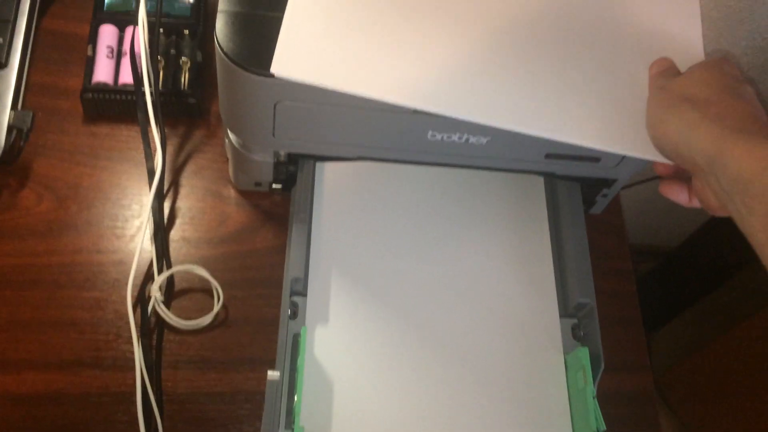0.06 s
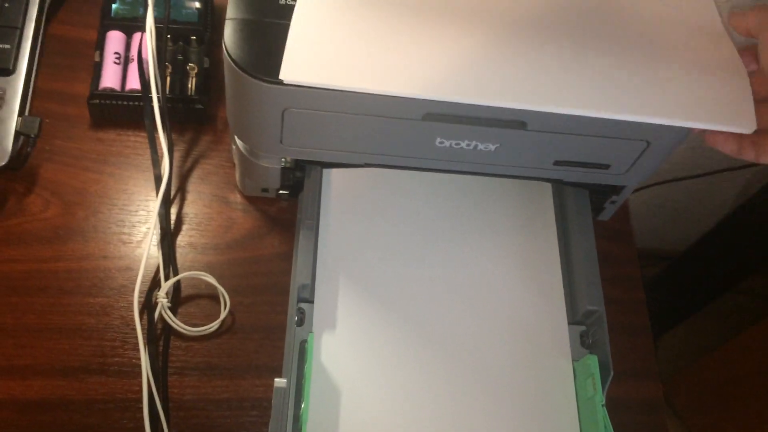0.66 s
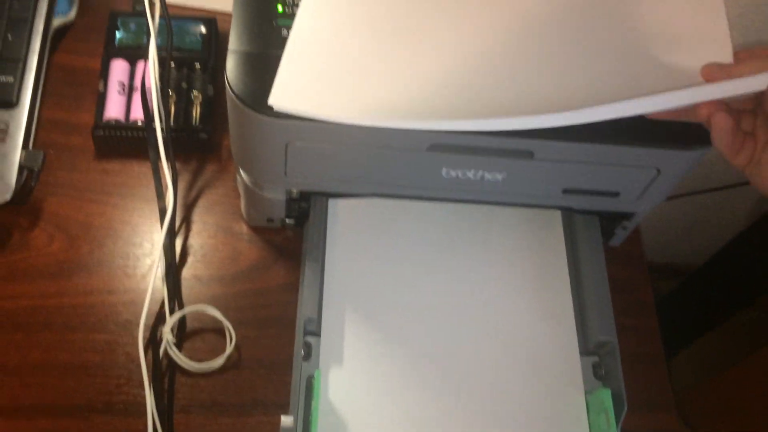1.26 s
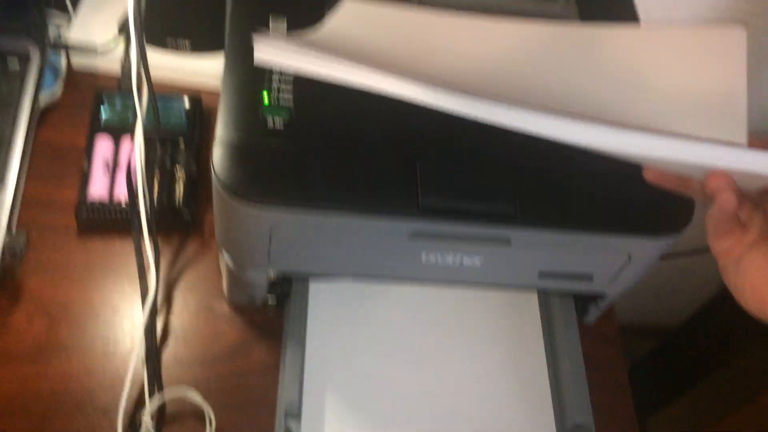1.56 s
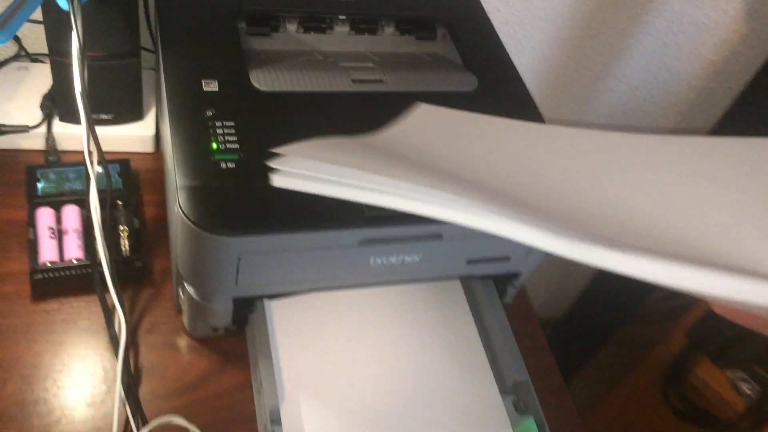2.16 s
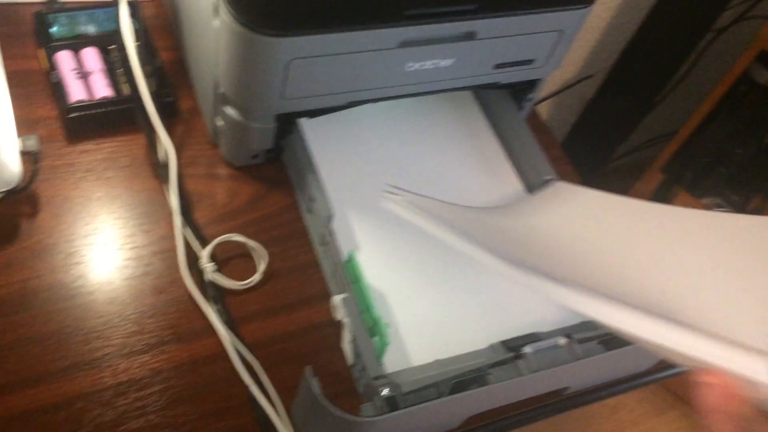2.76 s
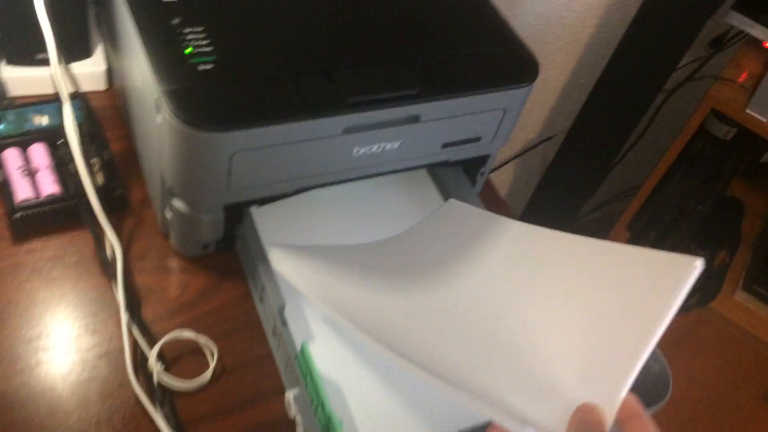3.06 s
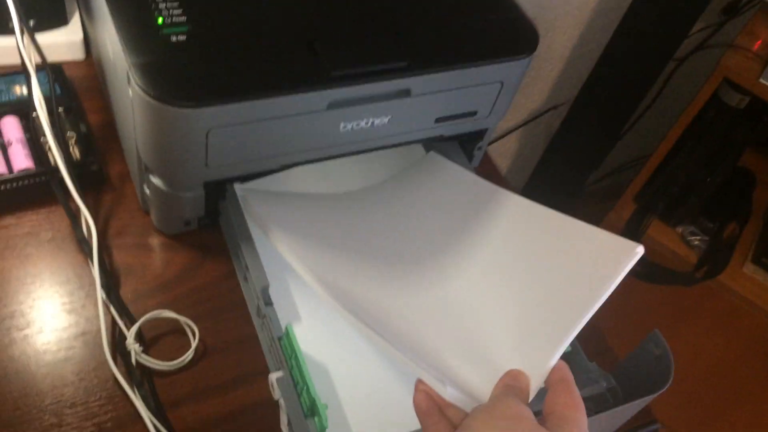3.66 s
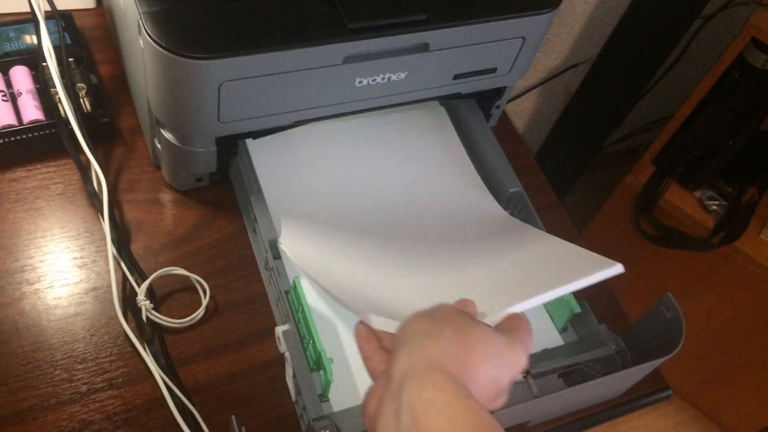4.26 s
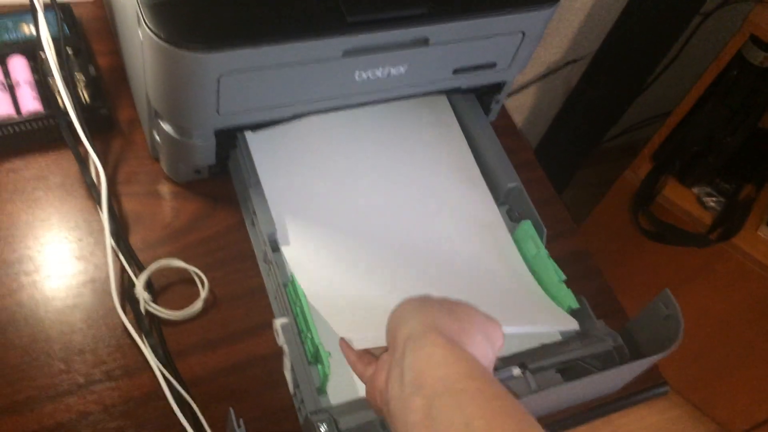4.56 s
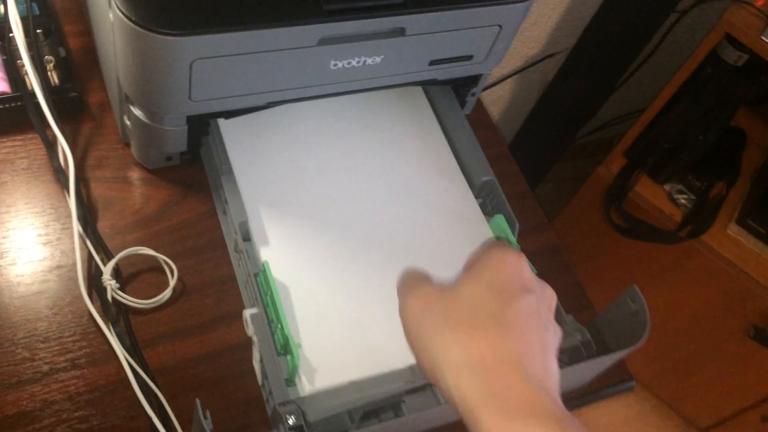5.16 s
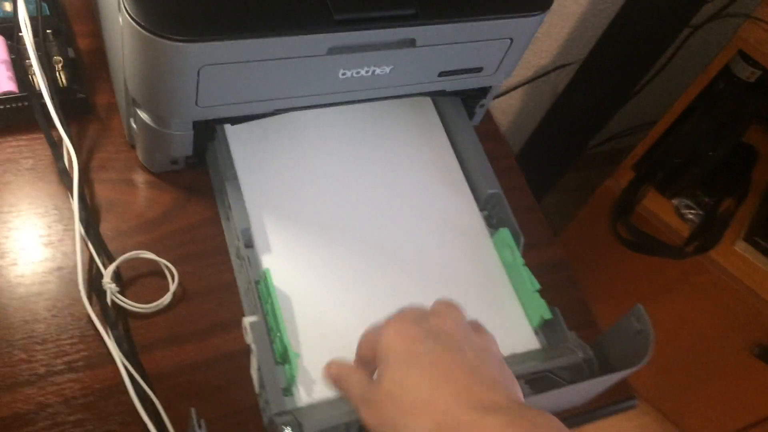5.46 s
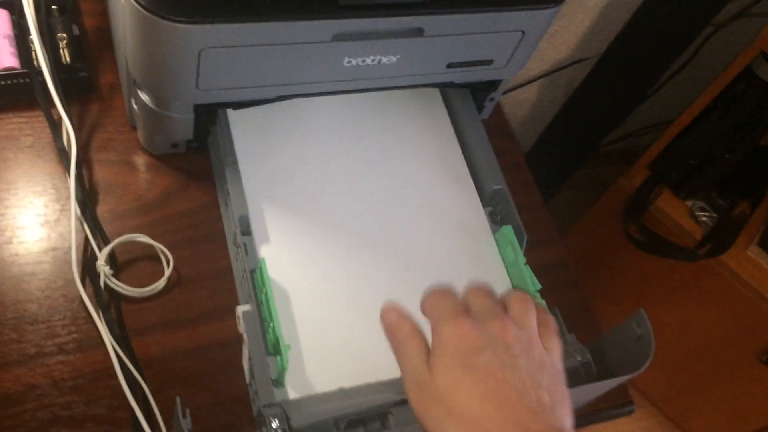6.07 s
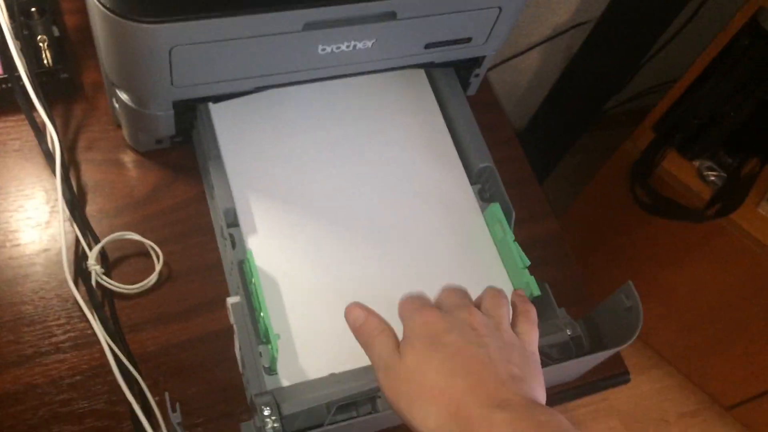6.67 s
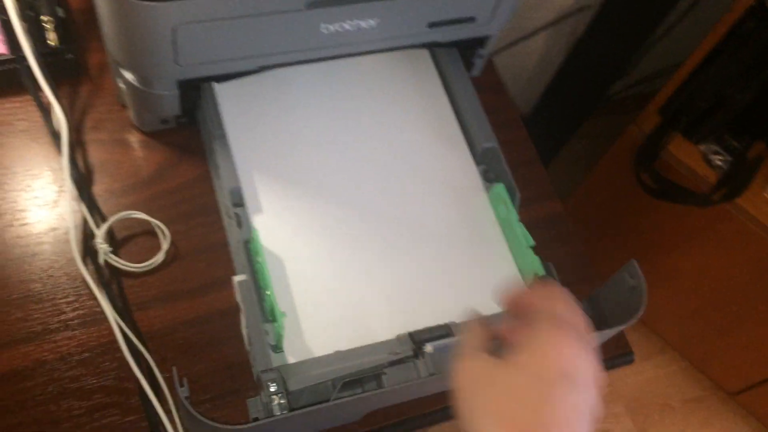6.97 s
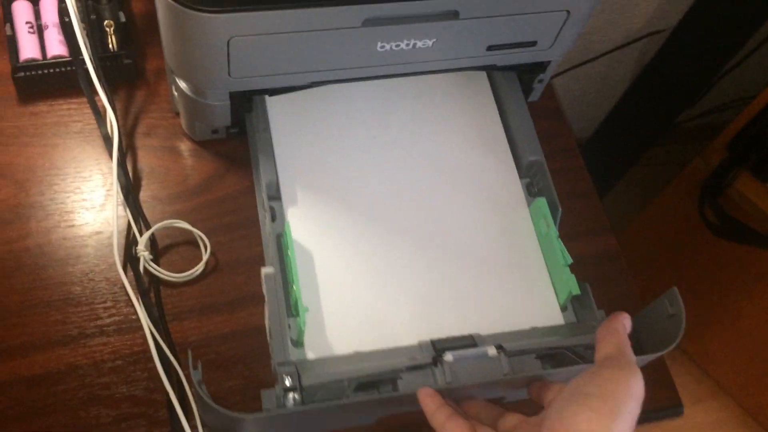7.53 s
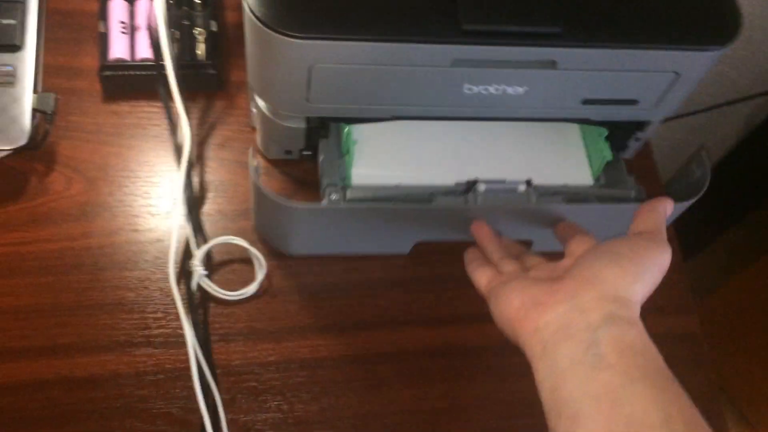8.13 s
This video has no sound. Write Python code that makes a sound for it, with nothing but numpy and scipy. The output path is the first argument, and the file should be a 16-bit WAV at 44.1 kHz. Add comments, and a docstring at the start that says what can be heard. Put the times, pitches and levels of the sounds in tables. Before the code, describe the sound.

Paper slides into a plastic printer tray, is patted down three times, and the tray scrapes and clacks shut over a faint fan hum.

```python
"""A stack of paper is loaded into the open plastic tray of a printer on a wooden desk.
The sheets brush the lid, slide and drop into the tray with a rub, a hiss and knocks on the plastic,
then a flat hand pats them down three times, each slap bouncing the tray on the desk.
The hand takes the front panel and pushes the tray home: its rails scrape and its catches clack.
Behind it all, a fan hums in the small room."""
import sys
import numpy as np
from scipy import signal
from scipy.fft import rfft, irfft
from scipy.io import wavfile

SR = 44100
rng = np.random.default_rng(int(sys.argv[2]) if len(sys.argv) > 2 else 0)


def int16_out(signal):
    """Quantize to a 16-bit WAV file."""
    q = np.round(np.clip(np.atleast_2d(signal).T, -1, 1) * 32767)
    wavfile.write(sys.argv[1], SR, q.astype(np.int16))


N = 370440
TIME = np.arange(N) / SR
SIZE = 2 ** 14   # samples in one hit and in its spectrum's transform
HZ = np.maximum(np.arange(SIZE // 2 + 1) * SR / SIZE, 1)


def sliding_paper(crinkle_db=-6):
    """Sliding sheets rub, hiss and crinkle; pressed down, they also make the tray beneath drone."""
    # strokes over lid and tray: (time [s], length [s], rub [dB], hiss [dB re rub], pressure [dB re rub])
    strokes = [(0.041, 0.041, -78, 6, -3), (0.87, .18, -72, -4.5, -4), (1.083, 0.035, -79.5, 11, -4),
               (1.387, 0.23, -70.5, -3, -5), (1.447, 0.046, -64, -6, -1), (1.866, 0.096, -76.5, -5, -14),
               (3.462, 0.074, -56.5, -8.5, -22), (3.584, 0.039, -58.5, -4, -16),
               (3.68, 0.09, -55.5, -9.5, -13), (3.869, 0.076, -49.5, -8.5, -25),
               (3.956, 0.081, -53, -8, -15), (4.08, .11, -72.5, 2, 7.5), (4.14, 0.074, -58, -7, -5),
               (4.303, 0.23, -57.5, -3.5, 1.5), (4.494, 0.16, -64.5, -3, 3), (4.663, 0.061, -66.5, 0.5, 7),
               (4.798, .07, -66.5, 3, 0), (4.89, 0.064, -67.5, 4.5, 2), (4.968, 0.051, -60.5, -0.5, 7.5),
               (5.054, 0.088, -53.5, -8.5, -1.5), (5.114, 0.049, -51, -6, -3), (5.616, 0.043, -69, 6, 2),
               (5.706, 0.041, -64, -0.5, 1), (5.821, 0.17, -73, 0, 5)]
    # midrange rub of the sheets: (frequency [Hz], level [dB])
    rub_tone = [(60, -21.5), (300, -15.5), (650, -15.5), (850, 1.5), (1000, -5.5), (1200, 2), (1430, -3),
                (1720, 3), (2400, -10), (3500, -16), (8000, -47.5)]
    # their airy hiss: (frequency [Hz], level [dB])
    hiss_tone = [(500, -23), (2500, -6.5), (4000, 0), (6000, -3.5), (9000, -8.5), (15000, -16)]
    # hollow drone of the tray: (frequency [Hz], level [dB])
    drone_tone = [(50, -11), (125, 0.5), (180, -13), (300, -0.5), (500, -2.5), (660, 5), (900, -9.5),
                  (1500, -20), (4000, -43)]
    power = np.zeros((3, N))
    for s, length, db, hiss_db, pressure_db in strokes:
        power += (from_db([[db], [db + hiss_db], [db + pressure_db]]) * stroke(s, length)) ** 2
    rub_level, hiss_level, drone_level = np.sqrt(power)
    rub = colour(rub_level * friction(grain_db=1.4), at_hz(rub_tone) + casing_db() / 2)
    crackle = rms_one(friction(grain_db=1.0, catch_db=0.3) + from_db(crinkle_db) * crinkles())
    hiss = colour(hiss_level * crackle, at_hz(hiss_tone))
    drone = colour(drone_level * friction(grain_db=4.0), at_hz(drone_tone) + casing_db())
    return rub + hiss + drone


def stroke(s, length, attack_s=0.039, release_s=0.035):
    """Envelope of a slide: it starts, holds its speed and dies away."""
    attack = np.clip((TIME - s) / attack_s, 0, 1)
    return attack * np.exp(-np.clip((TIME - s - length) / release_s, 0, 20))


def sheet_snaps():
    """A sheet's edge catches, with a slow squeak or a quick snap."""
    # edges catching: (time [s], level [dB], rise [s], fall [s])
    snaps = [(.05, -80.5, 0.027, .03), (1.099, -70, 0.014, 0.014), (4.977, -34.5, 0.00063, .0035),
             (5.012, -53.5, 0.0034, 0.0055)]
    # thin, bright colour of an edge: (frequency [Hz], level [dB])
    snap_tone = [(100, -22.5), (1900, -12), (2500, -22), (3300, -0.5), (3700, -6.5), (4050, 6), (4400, -4),
                 (4750, 3.5), (5300, -7), (6500, -12.5), (9000, -26.5), (15000, -34.5)]
    return small_part([(*snap, 1) for snap in snaps], snap_tone, ring_db=-13)


def pats(bounce_lag_s=0.0171, bounce_db=-2, top_db=3, top_hz=10500):
    """Each pat closes the sheets in a swelling slap; then the tray gives and bounces on the desk."""
    # the flat hand on the stack: (time [s], level [dB])
    slaps = [(6.245, -23), (6.4753, -24.8), (6.683, -24.5)]
    sheen_db = top_db / (1 + (top_hz / HZ) ** 4)   # the closing sheets lift the very top
    tone_db = blow_db(weight_db=3.5, treble_db=2) + sheen_db
    out, bounce = np.zeros(N), desk_bounce(upper_db=-1.5)
    for s, db in slaps:
        add(out, s, from_db(db) * strike(rise_s=0.012, fall_s=0.014, ring_db=-13, tone_db=tone_db))
        add(out, s + bounce_lag_s, from_db(db + bounce_db) * bounce)
    return out


def knocks(rise_share=0.23, ring_db=-10):
    """Paper, hand and tray knock on the plastic; longer knocks also have a softer attack."""
    # blows on the plastic: (time [s], level [dB], fall [s], weight [dB], treble [dB])
    blows = [ (0.354, -57.5, 0.0063, 2, -1), (0.461, -62.5, 0.0053, 1, 7), (.753, -46.5, 0.0027, -11, 7),
             (0.838, -45.5, 0.0066, 16.5, 7), (0.945, -57, 0.0035, 13, 3), (1.1623, -47, 0.028, 17, -14),
             (1.223, -36.5, 0.0097, 0, 4.5), (1.238, -31.5, 0.0038, -18, -32),
             (1.262, -41.5, 0.0072, -6, -23), (1.507, -50, 0.0096, -9, 0.5), (2.381, -63, 0.0084, -4, 0),
             (3.506, -39, 0.012, -21, -14), (4.188, -35, 0.011, 10, -10), (4.203, -43.5, 0.014, -14, -2),
             (4.269, -37.5, 0.0085, 2, -1.5), (4.458, -32, 0.011, -12, -7.5),
             (4.512, -28.5, 0.0063, -17, -5.5), (4.522, -29, 0.0064, -7, -13.5), (4.577, -34, 0.012, 3, 1),
             (4.702, -53.5, 0.018, 9, -5), (4.932, -50, 0.0055, 0, 10), (5.008, -45.5, 0.0085, 3, 4),
             (5.2008, -18, 0.008, -5, 4.5), (5.623, -49.5, 0.022, 33, 12.5), (5.670, -44, 0.012, 18, 6),
             (5.915, -53, 0.02, 0, -1.5), (5.947, -49, 0.0073, -5, -31), (5.976, -52, 0.0077, 6, 1),
             (6.773, -41, 0.0074, 29, -12), (6.872, -47.5, 0.037, 25, 3.5), (7.075, -50, 0.017, 12, 8),
             (7.36, -51, 0.0074, 7.5, 0.5), (7.453, -54, 0.016, 3, -5), (7.638, -48.5, 0.0061, 9, -12),
             (7.671, -46, 0.036, 10, -1), (7.73, -45, .005, -2, -2), (8.013, -41.5, 0.0063, 12, -10),
             (8.036, -39, 0.014, 20, 5.5), (8.074, -29, .011, 21, 5), (8.109, -41.5, 0.073, 10, -10),
             (8.1537, -25.5, .015, 3.5, 7), (8.202, -30, 0.03, 12, 4.5), (8.223, -31, 0.013, -10, -2.5),
             (8.29, -29, 0.0079, -11, 1.5), (8.333, -37.5, 0.019, 10, -4), (8.359, -33.5, 0.012, -9, 0.5)]
    out = np.zeros(N)
    for s, db, fall_s, weight_db, treble_db in blows:
        knock = strike(rise_share * fall_s, fall_s, ring_db, blow_db(weight_db, treble_db))
        add(out, s, from_db(db) * knock)
    return out


def panel_taps():
    """The thin panels of lid and tray front answer a tap with their own resonances."""
    # taps: (time [s], level [dB], rise [s], fall [s], pitch of the spot struck [ratio])
    taps = [(.753, -48, .0011, 0.0029, .69), (.841, -43.5, 0.00099, 0.013, 0.95),
            (5.848, -54.5, 0.0019, 0.015, 1.14), (6.926, -22.5, .0145, 0.0035, 0.98),
            (7.085, -40.5, 0.0019, 0.01, 1.04), (7.761, -38, 0.0038, 0.0085, .94),
            (7.833, -46.5, 0.0038, 0.013, 0.9)]
    # colour of a thin panel: (frequency [Hz], level [dB])
    panel_tone = [(60, -23), (450, -22), (750, -26.5), (1000, -7.5), (1170, -2.5), (1390, 3), (1500, -6),
                  (1680, -4.5), (2100, -14.5), (2650, -17.5), (3500, -29), (4300, -23.5), (5500, -39),
                  (15000, -54)]
    return small_part(taps, panel_tone, ring_db=-14.5)


def rails(push_at_s=7.481, speed_up_s=0.37, run_s=0.12, brake_s=0.42, grit_db=-7, shift_db=4):
    """Plastic scrapes on plastic, as loud as the tray is fast: gritty hiss, low judder and ringing."""
    # hiss of the scrape: (frequency [Hz], level [dB])
    hiss_tone = [(100, -13), (700, -6.5), (1300, -1), (2000, 0), (2700, -6.5), (4400, 0), (8000, -5.5),
                 (15000, -12.5)]
    # judder of the moving tray: (frequency [Hz], level [dB])
    judder_tone = [(30, -12), (70, -11), (125, -2.5), (190, -6.5), (420, -1), (800, -12), (2000, -13),
                   (6000, -60)]
    # rail resonances that come and go as the contact moves: (frequency [Hz], width [Hz], level [dB])
    resonances = [(3340, 120, 0), (4350, 120, -2), (5500, 140, -3), (5940, 140, -6), (6650, 180, 2)]
    corners_s = push_at_s + np.cumsum([0, speed_up_s, run_s, brake_s])
    speed = np.interp(TIME, corners_s, [0, 1, 1, 0])
    scrape = from_db(-50) * speed
    grit = rms_one(friction(grain_db=1.0, catch_db=1.5) + from_db(grit_db) * crinkles(per_s=220))
    hiss = colour(scrape * grit, at_hz(hiss_tone) + casing_db() / 2)
    judder = colour(scrape * friction(grain_db=1.5, catch_db=-0.5), at_hz(judder_tone) + casing_db())
    rings = 0
    for hz, width, db in resonances:
        ring = signal.lfilter(*signal.iirpeak(hz, hz / width, SR), rng.standard_normal(N))
        rings += from_db(db) * rms_one(ring * from_db(shift_db * drift(14)))
    return from_db(-2.5) * hiss + from_db(-5) * judder + from_db(-18) * scrape * rings


def tray_catches(rise_s=0.0017, fall_s=0.0083):
    """The tray's catches clack over their stops."""
    # clacks: (time [s], level [dB], pitch [ratio])
    clacks = [(8.079, -34.5, 0.93), (8.154, -20.5, 1), (8.224, -33, 1), (8.291, -33.5, 0.98),
              (8.362, -33, 0.99)]
    # peaky colour of a catch: (frequency [Hz], level [dB])
    clack_tone = [(100, -17), (380, -17.5), (520, -4), (800, -45), (1200, -4), (1550, -33), (1780, -2),
                  (1900, -2.5), (2060, -7.5), (2400, -20), (6000, -27.5), (15000, -50)]
    taps = [(s, db, rise_s, fall_s, pitch) for s, db, pitch in clacks]
    return small_part(taps, clack_tone, ring_db=-8.5)


def desk_thumps():
    """The heaviest shoves bump the tray on the desk with a dull thud."""
    # shoves: (time [s], level [dB], lift of the upper modes [dB])
    shoves = [(1.228, -45, -12), (4.193, -47, 10), (4.584, -41, 5), (5.208, -46.5, 18.5), (5.634, -51, 11),
              (6.942, -47, 5.5), (7.72, -45, -6), (8.081, -42, 2), (8.158, -36, 8), (8.224, -35, -14)]
    out = np.zeros(N)
    for s, db, upper_db in shoves:
        add(out, s, from_db(db) * desk_bounce(upper_db))
    return out


def desk_bounce(upper_db, press_s=0.015, upper_hz=200):
    """A soft push sets the tray bouncing in a few low modes; a sharper one favours the upper modes."""
    # modes of the tray on the desk: (frequency [Hz], level [dB], t60 [s])
    modes = [(78, -9.5, 0.16), (116.4, 3, 0.18), (156, -12, 0.29), (230.5, -6, 0.21), (375, -14, 0.21),
             (480.4, -13, 0.074)]
    t = TIME[:SIZE]
    bounce = sum(from_db(db + upper_db * (hz > upper_hz) - 60 * t / t60) * np.sin(2 * np.pi * hz * t)
                 for hz, db, t60 in modes)
    return bounce * (1 - np.exp(-t / press_s))


def small_part(taps, tone, ring_db):
    """A light part sounds with its own few resonances, higher or lower by where it is struck."""
    out = np.zeros(N)
    for s, db, rise_s, fall_s, pitch in taps:
        add(out, s, from_db(db) * strike(rise_s, fall_s, ring_db, at_hz(tone, HZ / pitch)))
    return out


def strike(rise_s, fall_s, ring_db, tone_db):
    """A contact feeds all bands evenly, so that the struck part alone sets its colour."""
    force = contact(rise_s, fall_s, ring_db)
    bins = np.arange(len(HZ))
    reach = 12 + 0.09 * bins   # the bands widen towards the treble
    low, high = np.maximum(bins - reach, 0), np.minimum(bins + reach, bins[-1])
    running_power = np.cumsum(np.abs(rfft(force)) ** 2)
    band_power = (np.interp(high, bins, running_power) - np.interp(low, bins, running_power)) / (high - low)
    sound = colour(force, tone_db - 10 * np.log10(band_power + 1e-12))
    return sound * np.linalg.norm(force) / np.linalg.norm(sound)


def contact(rise_s, fall_s, ring_db, uneven_db=1.5, swell_db=12):
    """Many edges land close together: a swell of tiny uneven impacts peaks, dies and leaves a ring."""
    t = TIME[:SIZE]
    landed = np.minimum(t / rise_s, 1)
    swell = landed * from_db(swell_db * (landed - 1))
    decay = np.exp(-np.maximum(t - rise_s, 0) / fall_s)
    grains = rms_one(rng.choice([-1, 1], SIZE) * from_db(uneven_db * rng.standard_normal(SIZE)))
    impacts = grains * swell * decay
    return impacts + from_db(ring_db) * signal.fftconvolve(impacts, tail())[:SIZE]


def friction(grain_db, catch_db=0.0):
    """Stick and slip: noise whose strength flickers in fine grains and slower catches."""
    return rms_one(rng.standard_normal(N) * from_db(grain_db * drift(200) + catch_db * drift(35)))


def crinkles(per_s=45, size_db=0.5, fall_s=0.0012):
    """Edges flick past each other in tiny noise bursts of uneven size."""
    flicks = (rng.random(N) < per_s / SR) * from_db(size_db * np.clip(rng.standard_normal(N), -2, 2))
    bursts = signal.lfilter([1], [1, -np.exp(-1 / (fall_s * SR))], flicks + 1e-18)
    return rms_one(bursts * rng.standard_normal(N))


def blow_db(weight_db, treble_db, bass_hz=(110, 330), low_mid_hz=600, treble_hz=(2800, 8000)):
    """Heavy blows carry more bass and low middle, hard ones more treble; all ring the casing."""
    # basic colour of a blow: (frequency [Hz], level [dB])
    blow_tone = [(30, -15.5), (70, -12.5), (150, 3.5), (195, -7), (260, -4.5), (500, -2.5), (800, -3),
                 (1400, 0), (2100, -3), (2500, -6.5), (4000, -7), (7000, -14), (10000, -21.5), (15000, -31)]
    bass = 1 / (1 + (bass_hz[0] / HZ) ** 2) / (1 + (HZ / bass_hz[1]) ** 4)
    low_mid = 0.48 * np.exp(-(np.log2(HZ / low_mid_hz) / 0.9) ** 2)
    treble = 0.53 * np.log2((1 + (HZ / treble_hz[0]) ** 2) / (1 + (HZ / treble_hz[1]) ** 2))
    return at_hz(blow_tone) + casing_db() + weight_db * (bass + low_mid) + treble_db * treble


def casing_db():
    """The plastic body stamps the same peaks and dips on blows and scrapes."""
    # resonances of tray and casing: (frequency [Hz], width [Hz], lift [dB])
    resonances = [(243.3, 45, 7), (365, 110, 3), (475, 66, 5), (634, 53, 4.5), (860, 120, 3),
                  (1335, 74, 3.5), (1543, 70, 5), (1736, 90, 5.5), (1922, 91, 4.5), (2130, 120, 3.5),
                  (2770, 56, -4), (3130, 89, 3), (3550, 90, -2), (4000, 120, 0), (5370, 180, -0.5),
                  (6650, 270, 1)]
    return sum(lift_db / (1 + (2 * (HZ - hz) / width) ** 2) for hz, width, lift_db in resonances)


def tail(build_s=0.0025):
    """Dense ring of casing and room: octave bands of noise die at their own rates; unit energy."""
    # decay of casing and room: (frequency [Hz], t60 [s])
    ring_times = [(100, 0.51), (400, 0.27), (1500, 0.23), (4000, 0.22), (14000, 0.087)]
    t, out = TIME[:SIZE], 0
    edges_hz = np.geomspace(50, 16000, 9)
    for low, high in zip(edges_hz, edges_hz[1:]):
        bandpass = signal.butter(2, [low, high], "band", fs=SR, output="sos")
        band = signal.sosfilt(bandpass, rng.standard_normal(SIZE))
        out += band * from_db(-60 * t / at_hz(ring_times, np.sqrt(low * high)))
    out *= 1 - np.exp(-t / build_s)
    return out / np.linalg.norm(out)


def fan(turn_hz=43.65, wander=0.001145, comb_db=-76, flutter_db=1.0, scatter_rad=0.66, air_db=-68.5):
    """One soft pulse per rotor turn makes a comb of tones over a motor's hum and the rush of air."""
    # rotor harmonics: (order [multiple of the turning rate], level [dB])
    harmonics = [(5, -4.5), (6, -2), (7, -20), (8, 3), (9, 1), (10, -1), (14, -19.5), (16, -22.5),
                 (18, -14), (19, -13), (20, -21), (21, -22.5), (22, -12), (24, -25), (25, -25.5),
                 (26, -20.5), (27, -27), (28, -12)]
    # partials of the motor's hum: (frequency [Hz], level [dB])
    hum_partials = [(123.8, -80), (185.5, -85), (247.5, -87)]
    # fader on the hum, which drops away partway: (time [s], gain [dB])
    hum_fader = [(0, -5), (.7, 2), (2.42, 4.5), (2.47, -11), (8.4, -12.5)]
    # rush of air: (frequency [Hz], level [dB])
    air_tone = [(15, -26.5), (30, -7), (48, 3), (100, 0), (220, -4), (330, -2), (455, -2.5), (560, -12.5),
                (720, -12.5), (950, -11), (1900, -15.5), (2600, -22), (7000, -25.5), (15000, -29)]
    angle = 2 * np.pi * np.cumsum(turn_hz * (1 + wander * drift(2))) / SR
    comb = 0
    for order, db in harmonics:
        level = from_db(comb_db + db + flutter_db * drift(7.5))
        comb += level * np.cos(order * angle + scatter_rad * rng.normal())
    hum = sum(from_db(db) * np.cos(2 * np.pi * hz * TIME + 0.93 * drift(4.4)) for hz, db in hum_partials)
    hum *= from_db(np.interp(TIME, *np.transpose(hum_fader)))
    air = from_db(air_db) * colour(rng.standard_normal(N), at_hz(air_tone))
    return np.sqrt(2) * (comb + hum) + air


def colour(x, curve_db):
    """Causal (minimum-phase) filter of unit energy, shaped like the given curve."""
    cepstrum = irfft(np.log(from_db(curve_db)))
    cepstrum[1:SIZE // 2] *= 2
    cepstrum[SIZE // 2 + 1:] = 0
    response = irfft(np.exp(rfft(cepstrum)))[:SIZE // 4]
    return signal.fftconvolve(x, response / np.linalg.norm(response))[:len(x)]


def drift(per_s):
    """Random wander around zero, gliding to a new value per_s times a second."""
    knots = rng.standard_normal(2000)
    return np.interp(TIME * per_s, np.arange(len(knots)), knots)


def at_hz(points, hz=HZ):
    """A table read on a log-frequency axis."""
    frequencies, values = np.transpose(points)
    return np.interp(np.log(hz), np.log(frequencies), values)


def add(out, s, sound):
    """Mixes a sound in at s seconds."""
    start = int(s * SR)
    out[start:start + len(sound)] += sound[:N - start]


def from_db(db):
    return 10 ** (np.asarray(db) / 20)


def rms_one(x):
    return x / np.sqrt(np.mean(x ** 2) + 1e-20)


def scene():
    """Paper, tray and fan, close up and in mono."""
    clicks = panel_taps() + sheet_snaps() + tray_catches()
    background = fan()
    hits = knocks() + pats() + desk_thumps()
    slides = sliding_paper() + rails()
    return (slides + hits + clicks + background)[None]


def record(dry):
    """A steep low-pass trims the very top."""
    cutoff_hz = 15500
    return signal.sosfilt(signal.ellip(12, 0.1, 70, cutoff_hz, fs=SR, output="sos"), dry)


dry = scene()
out = record(dry)
int16_out(out)
```